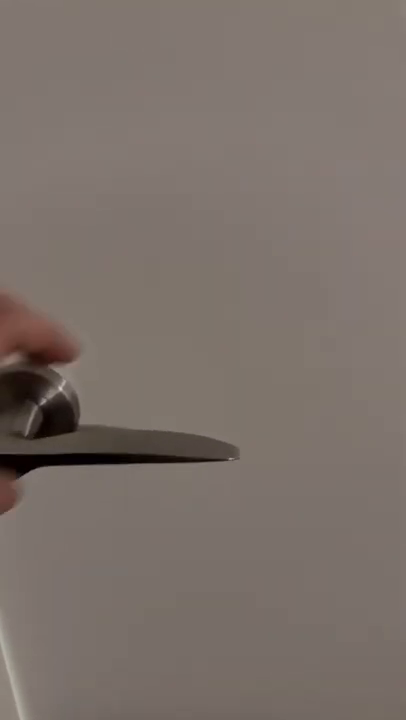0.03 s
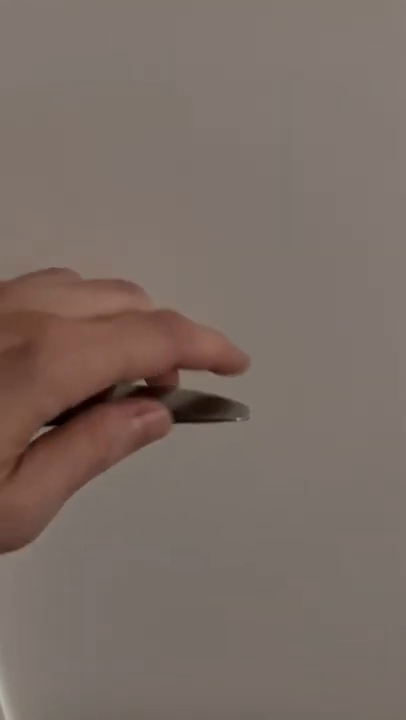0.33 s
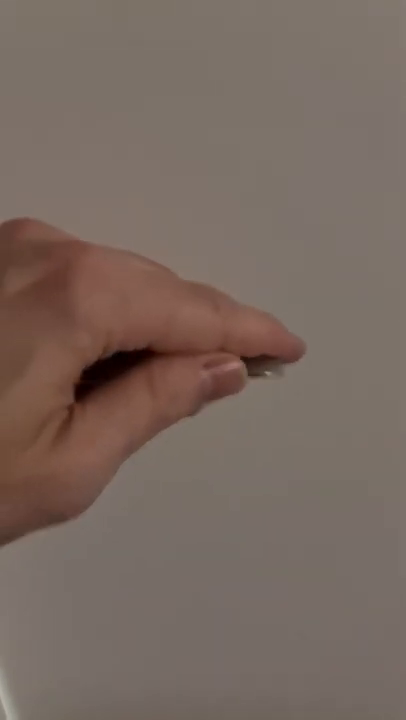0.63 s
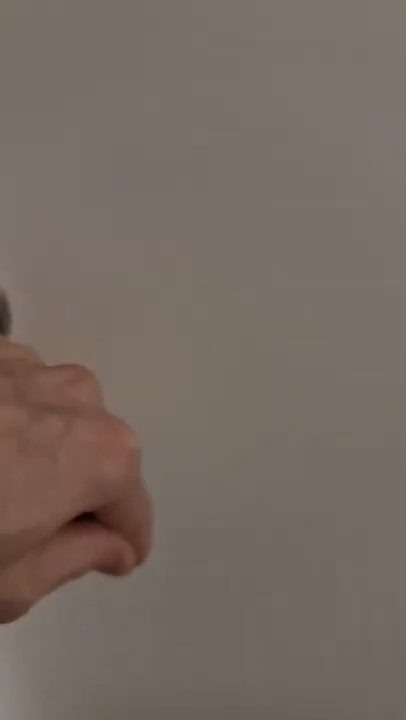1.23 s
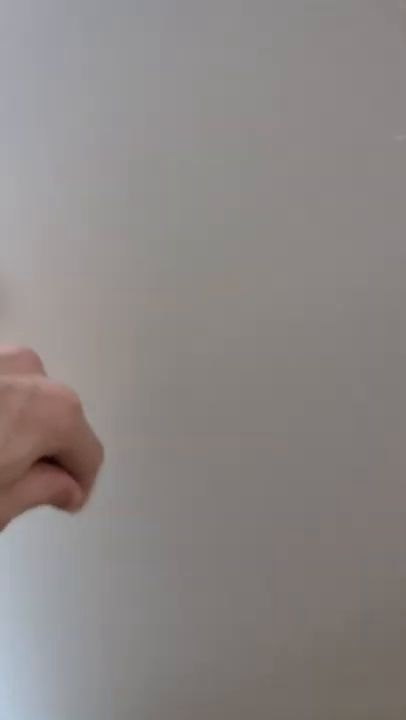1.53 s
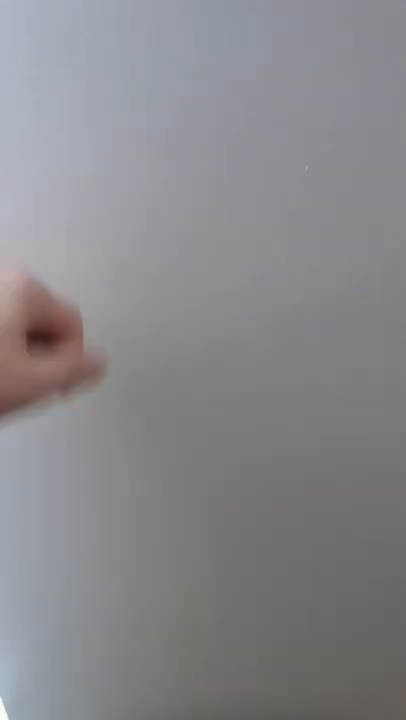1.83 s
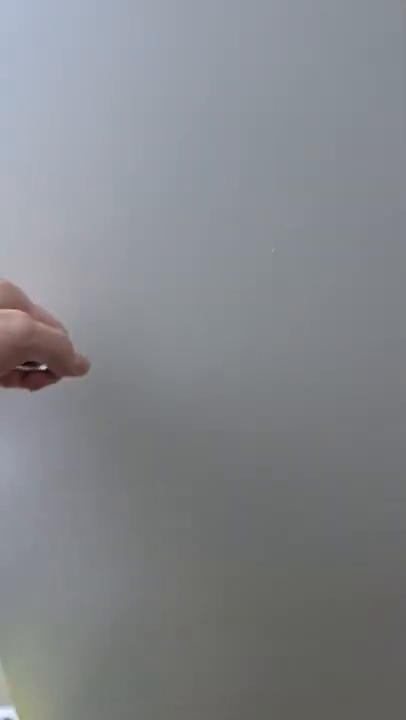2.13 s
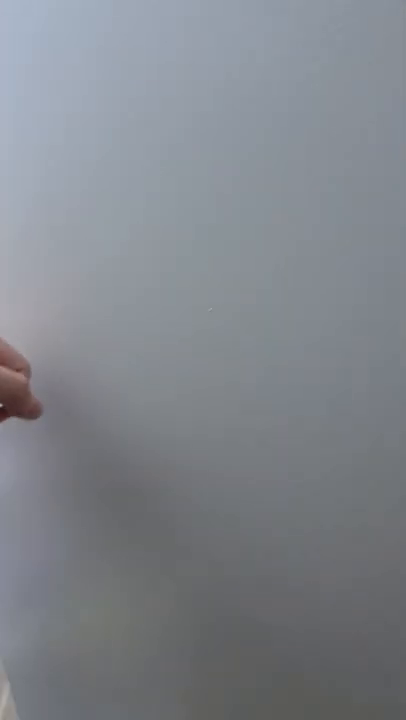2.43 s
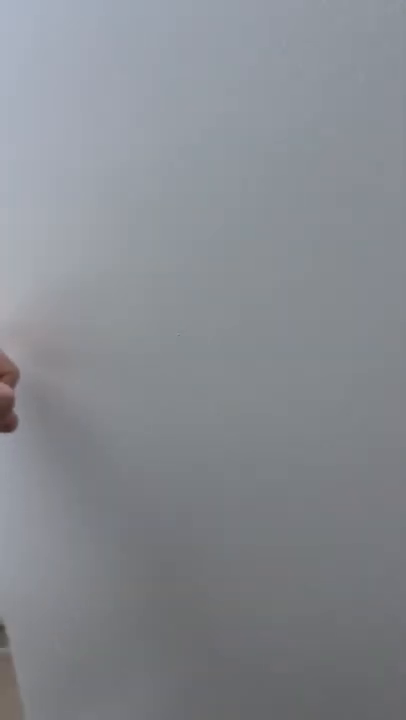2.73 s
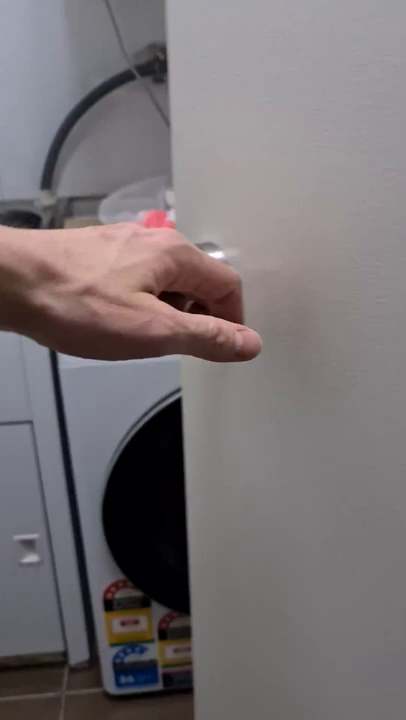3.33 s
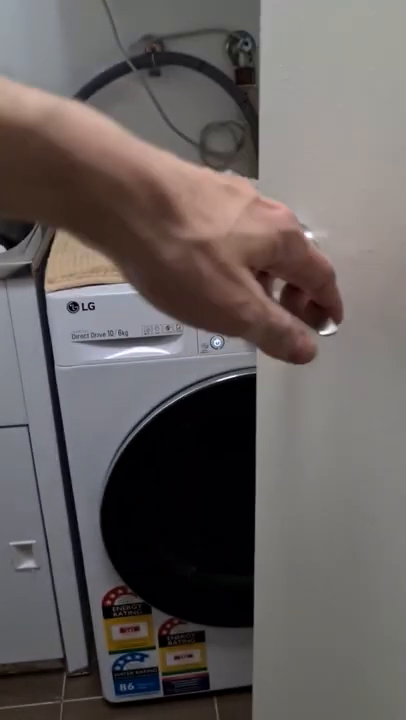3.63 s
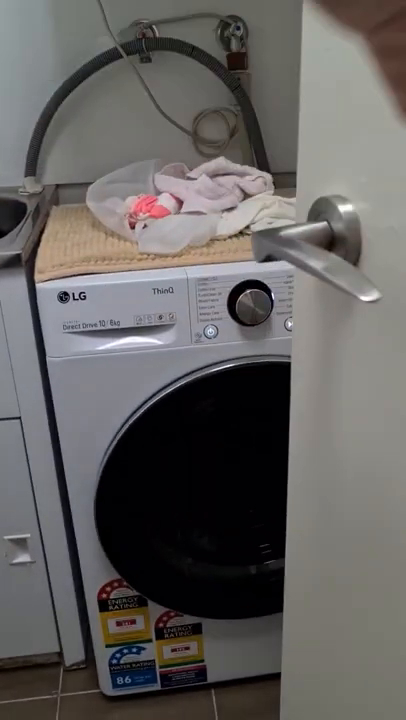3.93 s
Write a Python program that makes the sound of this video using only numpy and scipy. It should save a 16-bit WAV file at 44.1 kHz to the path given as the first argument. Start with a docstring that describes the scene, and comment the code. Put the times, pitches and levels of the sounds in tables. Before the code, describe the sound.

A spinning washing machine rumbles, growing louder as a door handle clicks and the door opens.

```python
"""Outside a laundry room, a washing machine spins behind the door. Its unbalanced drum shakes the
cabinet at every multiple of its speed, over a rush of air and water and a thin motor whine.
A hand turns the lever, the latch snaps free and the door swings open with a few dull thumps.
As the gap widens the drone grows louder and brighter, and its tones swell and fade as the
listener moves through the room's standing waves."""
import sys
import numpy as np
from scipy import signal
from scipy.fft import rfft, irfft, next_fast_len
from scipy.io import wavfile
from scipy.ndimage import map_coordinates

SR = 44100
rng = np.random.default_rng(int(sys.argv[2]) if len(sys.argv) > 2 else 0)


def transcribe(u):
    """Save the signal u as a 16-bit wav file named by the first command-line argument.

    u: samples, shape (n,) or (channels, n), limited to [-1, 1]; the rate is SR.
    q: integer samples, one column per channel.
    """
    v = np.clip(np.atleast_2d(u).T, -1, 1)
    q = np.round(v * 32767).astype(np.int16)
    wavfile.write(sys.argv[1], SR, q)


N = 176400

DRUM_HZ, KNOCK_ATTACK_S = 22.92, 0.005
# stereo width of the machine's sound: f/Hz, side level over mid/dB
SIDE_LEVEL = [(60, -20.5), (170, -17.5), (350, -8), (700, -3.5), (1400, 3), (2800, -1), (15000, 1)]
# spectrum of contact noise at the lever and latch: f/Hz, level/dB
CONTACT_SPECTRUM = [(200, 4), (1300, 9), (2200, 4), (3400, -1), (4800, 4), (6400, 2.5), (7500, -2.5),
                    (11000, -0.5), (15500, -2)]


def amp(db):
    """Amplitude ratio of a level in decibels."""
    return 10 ** (np.asarray(db) / 20)


def unit(x):
    """Normalisation to rms 1."""
    return x / np.sqrt(np.mean(x ** 2) + 1e-20)


def along(points, hz, axis=1):
    """Interpolation of one table column on a log-frequency axis."""
    cols = np.transpose(points)
    return np.interp(np.log(hz + 1), np.log(cols[0] + 1), cols[axis])


def curves(rows, t):
    """Linear interpolation at times t of each column after the first."""
    times, *cols = np.transpose(rows)
    return [np.interp(t, times, col) for col in cols]


def wobble(position):
    """A smooth random curve with one knot per unit of position."""
    return map_coordinates(rng.standard_normal(size=256), [position + 2], mode='mirror')


def filtered(x, response):
    """Linear filtering: the spectrum of x times a frequency response."""
    n = x.shape[-1]
    m = next_fast_len(n + SR // 8)
    return irfft(rfft(x, m) * response(np.fft.rfftfreq(m, 1 / SR)), m)[..., :n]


def door_transmission(shut_db, open_db, hz, t):
    """Incoherent addition: the paths through the leaf and the widening gap sum in power."""
    # opening of the gap: t/s, level/dB before frequency weighting
    gap = [(1.15, -21), (1.3, -13.5), (1.42, -7.5), (1.66, -5), (2.0, -4), (2.3, -2), (2.6, -2),
           (2.85, -0.83), (3.35, -0.25), (3.7, 0.14), (4, 0.45)]
    # frequency weighting of that level: f/Hz, factor/(dB per dB)
    gap_weight = [(46, 1.5), (69, 0.8), (115, 2), (160, 2.2), (200, 0), (235, 3), (340, 2.36), (410, 2.12),
                  (500, 1), (640, 0.5), (800, 1.23), (1100, 1.16), (1600, 1.43), (2500, 1.44), (5000, 1.7),
                  (10000, 1.8)]
    gap_db = along(gap_weight, hz) * curves(gap, t)[0]
    return np.hypot(amp(shut_db), amp(open_db + gap_db))


def drum():
    """Forced vibration: imbalance drives the cabinet at each multiple of the drum's speed (mid, side)."""
    # low harmonics: order, level with door shut/dB, level with door open/dB
    low_orders = [(1, -48, -42), (2, -77, -37), (3, -38.5, -29), (4, -47, -46), (5, -55, -34.5),
                  (6, -86, -37.5), (7, -40.5, -31.5), (8, -59, -40.5), (9, -45.5, -44.5), (10, -61, -33.5),
                  (11, -69, -44), (12, -82, -54), (13, -54, -40.5), (14, -55.5, -37.5), (15, -44, -30.5),
                  (16, -44.5, -36), (17, -56, -40), (18, -50.5, -31.5), (19, -58, -37), (20, -67, -33),
                  (21, -58, -38.5), (22, -55.5, -45), (23, -60.5, -48), (24, -64, -42.5), (25, -67, -49),
                  (26, -68, -43), (27, -53.5, -37.5), (28, -59, -45.5), (29, -49, -39.5), (30, -54.5, -41),
                  (31, -63, -47), (32, -55.5, -39.5), (33, -73, -46), (34, -60, -44.5), (35, -63, -41),
                  (36, -62, -44.5)]
    # cabinet buzz, per higher harmonic: f/Hz, level shut/dB, level open/dB
    buzz = [(843, -66, -44), (910, -65, -50), (1060, -58, -48.5), (1110, -73, -50.5), (1205, -60.5, -48.5),
            (1475, -66.5, -53), (1520, -62.5, -50.5), (1950, -70.5, -55.5), (2240, -81, -63),
            (2590, -72.5, -68)]
    # standing waves shift as the door passes: t/s, level/dB of each of the four orders in swell_db
    standing_waves = [(1.1, -5.5, -2, 3.5, 7), (1.45, 2.5, -2.5, 0, 2.5), (1.85, 6.5, 0, 1, 1.5),
                      (2.2, 2, 4.5, -3.5, 4), (2.45, -8, 4.5, -4, 1.5), (2.68, -1, 6.5, 2, -5),
                      (2.88, -14, 4.5, -11, 1.5), (3.15, -20, -0.5, -0.5, 2), (3.5, -11, -8, 2.5, -3),
                      (4, -2, -20, 3, -18)]
    # the listener's walk: t/s, distance/m
    walk = [(0, 0.066), (1.1, 0.14), (4, 1.32)]
    t, slow = np.arange(N) / SR, np.linspace(0, N / SR, 400)
    swell_db = dict(zip((9, 15, 18, 20), curves(standing_waves, slow)))
    turns = DRUM_HZ * t + 0.0012 * np.interp(t, slow, wobble(5 * slow))  # slightly uneven speed
    metres, = curves(walk, slow)
    out = np.zeros((2, N))
    for k in range(1, 116):
        hz = k * DRUM_HZ
        half_waves = metres * 2 * hz / 343  # distance walked in half wavelengths
        shortness = min(hz / 600, 1)  # short waves wander and tremble most
        if k <= len(low_orders):
            shut_db, open_db = low_orders[k - 1][1:]
        else:
            scatter_db = rng.uniform(-10.835, 5.5, 2)
            shut_db, open_db = scatter_db + [along(buzz, hz), along(buzz, hz, axis=2)]
        wander_db = 2.5 * shortness * np.clip(metres / 0.13, 0, 1) * wobble(half_waves)
        wander_db += 0.96 * wobble(9 * slow)  # quick flutter
        if k in swell_db:
            wander_db = swell_db[k] + 0.25 * wander_db
        # the loose cabinet trembles in amplitude and phase
        tremble = 1 + 0.17 * shortness ** 2 * (wobble(24 * slow) + 1j * wobble(24 * slow))
        phase = rng.uniform(0, 2 * np.pi) + 0.67 * wobble(half_waves)
        gain = door_transmission(shut_db, open_db, hz, slow) * amp(wander_db)
        mid = gain * tremble * np.exp(1j * phase)
        side_phase = np.pi * (rng.integers(2) + 0.5) + 1.84 * wobble(half_waves)
        side = mid * amp(along(SIDE_LEVEL, hz)) * np.exp(1j * side_phase)
        angle = 2 * np.pi * (k * turns % 1)
        cos, sin = np.cos(angle), np.sin(angle)
        out += [np.interp(t, slow, g.real) * cos + np.interp(t, slow, g.imag) * sin for g in (mid, side)]
    return np.sqrt(2) * out


def motor_whine(hz, t, centre_hz=5420, width_hz=160):
    """Narrow-band noise: the amplitude spectrum of the motor's slightly wavering whine."""
    band = np.exp(-0.5 * ((hz - centre_hz) / width_hz) ** 2) / np.sqrt(2 * width_hz)
    waver = amp(2.3 * wobble(13 * t))
    return door_transmission(shut_db=-72, open_db=-53.5, hz=hz, t=t) * band * waver


def rush():
    """Amplitude modulation: the noise of air, water and motor throbs with each turn (mid, side)."""
    # spectral density of air and water: f/Hz, level in 1 Hz shut/dB, level in 1 Hz open/dB
    flow_spectrum = [(18, -80, -78), (34, -77, -62), (60, -61, -53), (106, -81, -58.5), (168, -67, -53.5),
                     (250, -69.5, -61), (410, -76.5, -62.5), (686, -83, -69), (1060, -79.5, -64),
                     (1680, -87.5, -68.5), (2010, -83, -71.5), (3100, -91.5, -82), (4130, -97, -84),
                     (5600, -95, -84), (7100, -110, -95.5), (10900, -112, -96.5), (15500, -110, -94.5)]
    hz, t, white = signal.stft(rng.standard_normal((2, N)), SR, nperseg=2048)
    hz = hz[:, None]
    flow = door_transmission(along(flow_spectrum, hz), along(flow_spectrum, hz, axis=2), hz, t)
    width = np.array([np.ones_like(hz), amp(along(SIDE_LEVEL, hz))])
    spectrum = white * np.hypot(flow, motor_whine(hz, t)) * width
    noise = signal.istft(spectrum, SR)[1][:, :N] * np.sqrt(SR / 2)
    angle = 2 * np.pi * DRUM_HZ * np.arange(N) / SR
    throb = sum(np.cos(k * angle + rng.uniform(0, 2 * np.pi)) / k for k in range(1, 4))
    return noise * (1 + 0.076 * throb)


def hand_rub(start_s=0.59, end_s=1.14, fade_s=0.037, level_db=-64):
    """Sliding friction: the hand makes a faint, uneven hiss on the turning lever."""
    t = np.arange(N) / SR
    stroke = np.clip(np.minimum(t - start_s, end_s - t) / fade_s, 0, 1)
    hiss = unit(filtered(rng.standard_normal((2, N)), lambda hz: amp(along(CONTACT_SPECTRUM, hz))))
    return hiss * stroke * amp(level_db + 2.2 * wobble(25 * t))


def latch(snap_t60=0.0087, scrape_attack_s=0.0011):
    """Impact excitation: each contact is a hard snap and a short scrape that rings the steel's modes."""
    # contacts: t/s, scrape level/dB, snap level/dB, ring over scrape/dB, low-pass f/Hz, scrape T60/s
    contacts = [(.733, -42, -43, 3, 7460, 0.051), (0.915, -38, -46.5, 0, 16000, 0.017),
                (.9934, -49, -53, 0, 8000, 0.012), (1.107, -35, -45, 0, 15000, .012),
                (1.1144, -29, -30, -3, 6000, 0.016), (1.12, -34, -41, -3, 11000, 0.028),
                (1.1226, -27.5, -29, -6, 17500, 0.048), (1.1818, -27, -25, 6, 9000, 0.023),
                (1.893, -44, -50, -5, 16000, .05), (1.954, -38, -36, -8, 18000, 0.02),
                (1.9584, -30, -25, -9, 16000, 0.032), (1.965, -35.5, -50, -9, 17000, 0.14),
                (2.205, -46, -54, -5, 12000, 0.22), (2.618, -32, -33, 6, 9400, 0.077)]
    # modes of the latch: f/Hz, level/dB, T60/s
    steel_modes = [(4640, -24, 0.03), (5950, -21, .13), (6430, -13, 0.066), (8750, -19, .05)]
    out, t = np.zeros((2, N + SR)), np.arange(SR // 4) / SR
    for onset, scrape_db, snap_db, ring_db, corner_hz, t60 in contacts:
        lowpass = lambda hz: 1 / np.hypot(1, (hz / corner_hz) ** 3.6)
        colour = lambda hz: amp(along(CONTACT_SPECTRUM, hz)) * lowpass(hz)
        burst = lambda life: unit(filtered(rng.standard_normal((2, len(t))), colour)) * amp(-60 * t / life)
        ring = 0
        for hz, db, mode_t60 in steel_modes:
            tone = np.sin(2 * np.pi * (hz * t + rng.random((2, 1))))
            ring += lowpass(hz) * amp(db - 60 * t / mode_t60) * tone
        attack = 1 - np.exp(-t / scrape_attack_s)
        scrape = amp(scrape_db) * (burst(t60) + amp(ring_db) * ring) * attack
        out[:, round(onset * SR):][:, :len(t)] += scrape + amp(snap_db) * burst(snap_t60)
    return out[:, :N]


def lever():
    """Resonance: the sprung lever strikes its stops, ringing its housing and knocking the door panel."""
    # impacts on the stops: t/s, housing level/dB, panel level/dB, T60/s
    stops = [(.735, -21, -31, .075), (1.955, -25, -14.5, .06)]
    # modes of the housing: f/Hz, width/Hz, level/dB
    housing_modes = [(322, 20, 0), (385, 40, -6), (540, 45, -10)]
    # spectrum of the hollow wooden panel: f/Hz, level/dB
    panel = [(120, -25), (260, -8), (380, 0), (560, -2), (720, -14), (1500, -24), (4000, -50)]
    out, t = np.zeros(N + SR), np.arange(SR // 4) / SR
    for onset, housing_db, panel_db, t60 in stops:
        ring = sum(amp(db) * np.sin(2 * np.pi * hz * t + 0.99 * wobble(width * t))
                   for hz, width, db in housing_modes)
        wood = unit(filtered(rng.standard_normal(len(t)), lambda hz: amp(along(panel, hz))))
        envelope = amp(-60 * t / t60) * (1 - np.exp(-t / KNOCK_ATTACK_S))
        out[round(onset * SR):][:len(t)] += (amp(housing_db) * ring + amp(panel_db) * wood) * envelope
    return out[:N]


def door_thumps():
    """Damped free vibration: each push leaves the door leaf shuddering at one low frequency."""
    # thumps of the leaf: t/s, f/Hz, level/dB, T60/s
    thumps = [(0.975, 47.7, -16, 0.11), (1.008, 155, -25, 0.11), (1.122, 48.3, -25, 0.12),
              (1.183, 164, -20.5, 0.082), (1.995, 127, -24, 0.27), (2.2, 121, -23, .08)]
    out, t = np.zeros(N + SR), np.arange(SR // 2) / SR
    for onset, hz, db, t60 in thumps:
        envelope = amp(db - 60 * t / t60) * (1 - np.exp(-t / KNOCK_ATTACK_S))
        out[round(onset * SR):][:len(t)] += envelope * np.sin(2 * np.pi * hz * t)
    return out[:N]


def room(x):
    """Reverberation: reflections from hard walls decay exponentially, the top treble first."""
    decay = [(200, 0.17), (2000, 0.22), (6000, 0.22), (15000, 0.14)]  # f/Hz, T60/s
    hz, t, white = signal.stft(rng.standard_normal((2, SR // 2)), SR)
    tail = signal.istft(white * amp(-60 * t / along(decay, hz)[:, None]), SR)[1]
    return signal.fftconvolve(x, tail / np.linalg.norm(tail[0]), axes=1)[:, :N]


def scene():
    """Superposition of the machine beyond the door and the hardware close by."""
    left_over_right_db, room_db = -1.3, -3.5
    mid, side = drum() + rush()
    balance = amp([[left_over_right_db / 2], [-left_over_right_db / 2]])
    machine = np.array([mid + side, mid - side]) * balance
    hardware = latch() + hand_rub() + lever()
    return machine + hardware + amp(room_db) * room(hardware) + door_thumps()


def record(dry):
    """Band limiting: an ideal low-pass removes the highest treble."""
    return filtered(dry, lambda hz: hz < 15800)


dry = scene()
out = record(dry)
transcribe(out)
```